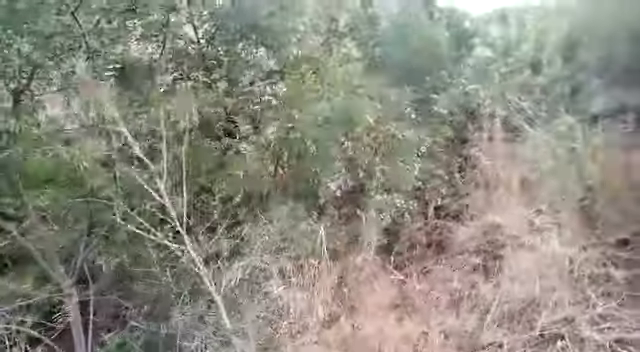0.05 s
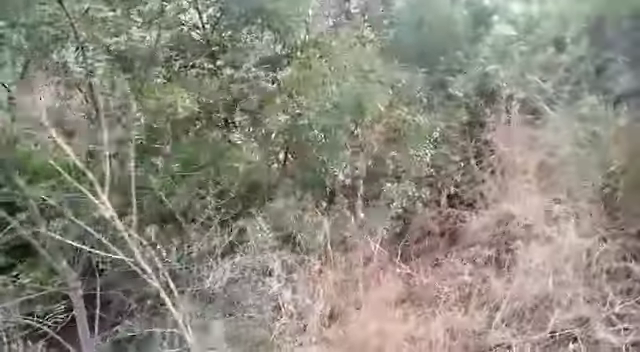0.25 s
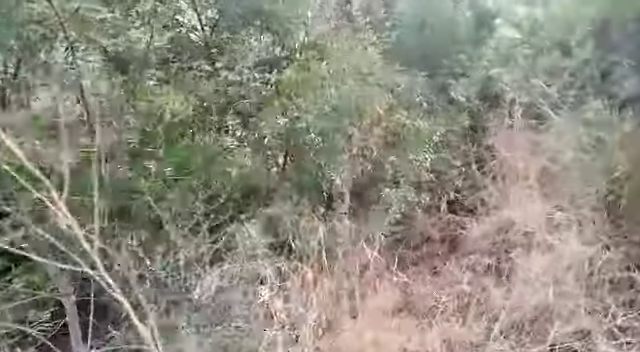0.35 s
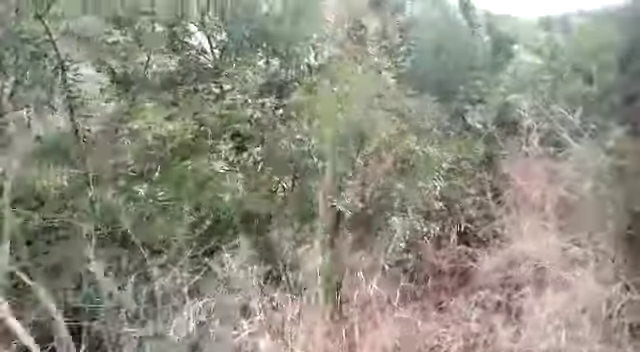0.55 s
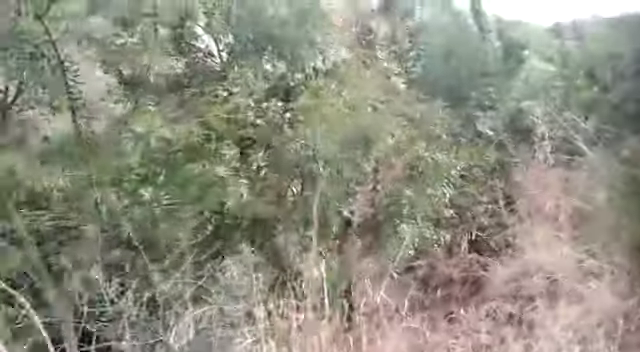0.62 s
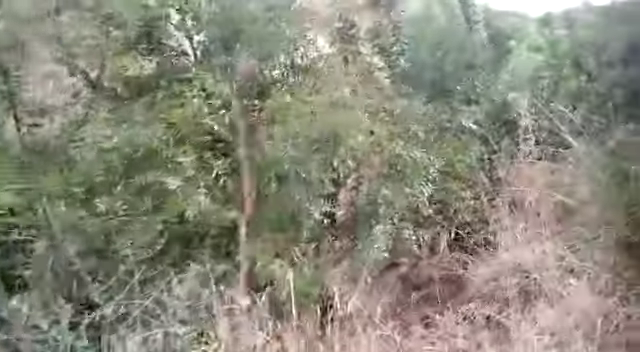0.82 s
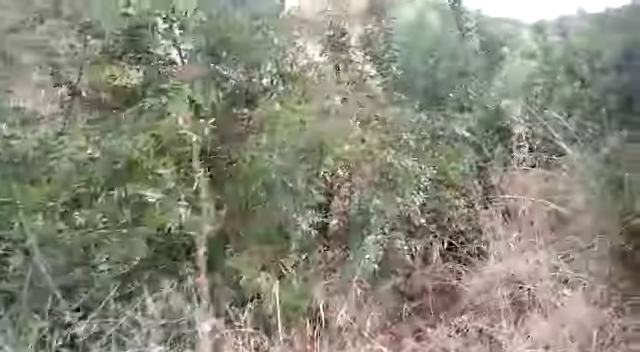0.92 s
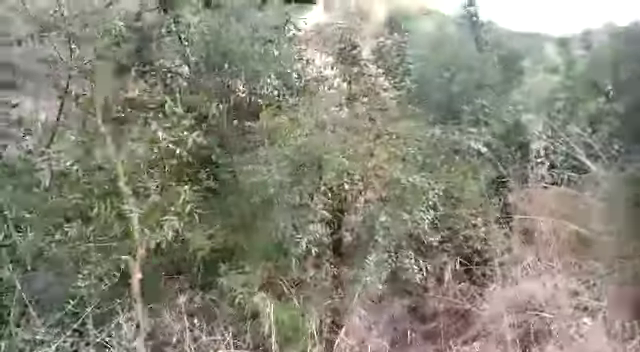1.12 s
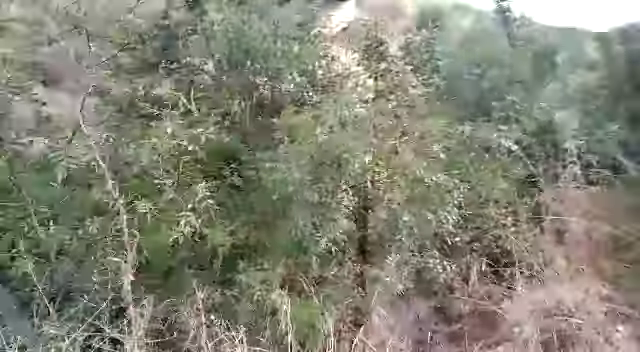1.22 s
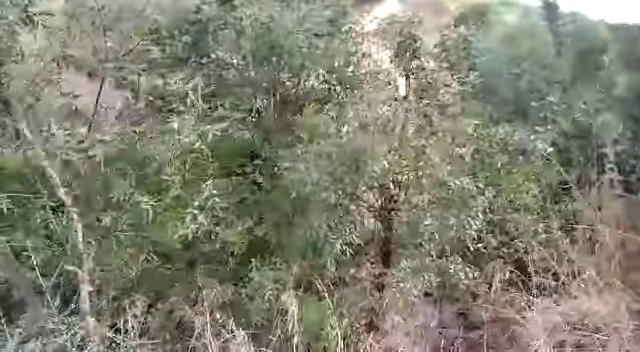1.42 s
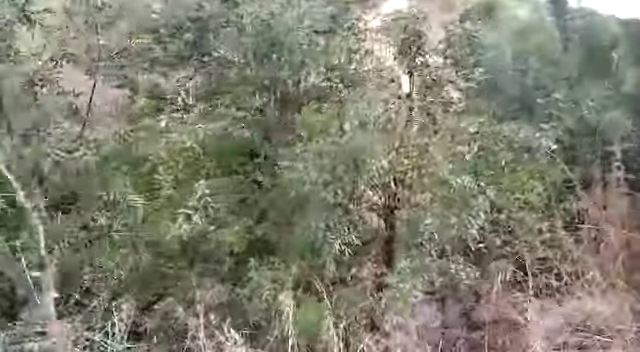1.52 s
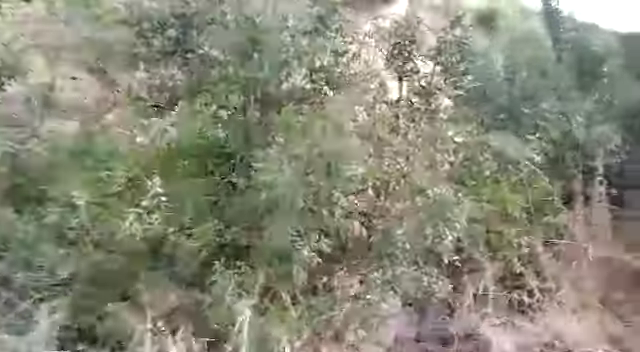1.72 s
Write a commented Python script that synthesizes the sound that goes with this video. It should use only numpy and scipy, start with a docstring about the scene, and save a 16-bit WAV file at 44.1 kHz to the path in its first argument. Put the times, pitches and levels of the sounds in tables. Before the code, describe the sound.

Wind gusts buffet a hand-held microphone outdoors, with dry stems snapping close by over faint stream wash

```python
"""Dry scrub beside a stream, heard through a hand-held pair of microphone ports.
Gusts buffet the left port with fluttering eddy noise and pitched slaps; the right port is sheltered.
A few dry stems snap close on the left, each a burst of short, decaying resonances with echoes.
Behind them a stream washes (flickering noise) and gurgles (rising bubble tones),
and leaves hiss in the wind (two bands of noise with fine crackle)."""
import sys
import numpy as np
from scipy import signal
from scipy.fft import rfft, irfft
from scipy.io import wavfile
from scipy.ndimage import uniform_filter1d

SR = 44100
rng = np.random.default_rng(int(sys.argv[2]) if len(sys.argv) > 2 else 0)


def waveform_to_disk(signal):
    """Save audio, clipped to [-1, 1], as 16-bit WAV at the path in sys.argv[1]."""
    frames = np.transpose(np.atleast_2d(signal))
    scaled = np.clip(frames, -1, 1) * 32767
    samples = np.round(scaled).astype(np.int16)
    wavfile.write(sys.argv[1], SR, samples)


N = 77175

# The background's levels over time.
# Each row: time in seconds, stream wash in dB, leaf hiss in dB, treble hiss in dB.
BACKGROUND_LEVELS = [(0, -51, -48.5, -53), (.15, -47.5, -47.5, -53.5), (.3, -48, -47, -53.5),
                     (.45, -49.5, -48.5, -55), (.58, -51.5, -45.5, -53), (.7, -46.5, -41.5, -51.5),
                     (.8, -48.5, -47, -54), (.9, -48, -49, -54.5), (1.05, -48, -47, -53.5),
                     (1.13, -45, -46.5, -50.5), (1.2, -46, -47, -52.5), (1.33, -44, -47, -53),
                     (1.45, -43, -45.5, -54.5), (1.6, -42.5, -46, -53.5), (1.75, -43, -46, -53)]
LEFT_GAIN_DB = 4  # lifts both the gusts and the slaps on the left port


def amp(db):
    """Turns decibels into an amplitude factor."""
    return 10 ** (np.asarray(db) / 20)


def evened(x):
    """Scales x to an RMS of one."""
    return x / np.sqrt(np.mean(x ** 2) + 1e-20)


def read(points, hz):
    """Reads a table of (Hz, value) at any frequency, along a log scale."""
    f, value = np.transpose(points)
    return np.interp(np.log(hz + 1), np.log(f + 1), value)


def curve(table, col):
    """Draws one column of a timed table as straight lines over the scene."""
    rows = np.array(table)
    return np.interp(np.arange(N) / SR, rows[:, 0], rows[:, col])


def coloured(x, points):
    """Filters x by a spectrum, silent outside its ends."""
    hz = np.fft.rfftfreq(N, 1 / SR)
    inside = (hz > points[0][0]) & (hz < points[-1][0])
    return irfft(rfft(x) * amp(read(points, hz)) * inside, N)


def buffeting():
    """Eddies press on each port: a low thud and brighter flutter on the left, a faint thud on the right."""
    # Wind on the left port. Each row: time in seconds, level in dB before the left gain,
    # brightness in dB (high flutter over low).
    gusts = [(0.0, -39.5, -4), (0.022, -45.5, -23), (0.036, -36.5, -4), (0.058, -43, -16),
             (0.094, -52.5, -1), (0.146, -49.5, -3), (0.232, -40.5, -11), (0.244, -23, -10.5),
             (0.26, -23.5, -16.5), (0.286, -25.5, -8), (0.324, -35, -16), (0.344, -18, -8.5),
             (0.374, -23, -7.5), (0.386, -16, -12), (0.444, -20, -13.5), (0.462, -26.5, -6.5),
             (0.488, -15.5, -28.5), (0.53, -17, -6), (0.554, -26, -14), (0.585, -20, -20),
             (0.615, -23, -17), (0.66, -30, -17), (0.698, -27.5, -26), (0.712, -18, -15.5),
             (0.74, -41.5, -23), (0.764, -34.5, -19), (0.8, -37, -36), (0.83, -35.5, -30),
             (0.878, -38, -37), (0.896, -43, -18), (0.945, -41, -22), (0.974, -28.5, -16),
             (1.002, -41.5, 1.5), (1.022, -31.5, -31), (1.044, -20.5, -23), (1.098, -18, -22),
             (1.12, -25, -24), (1.136, -23.5, -15.5), (1.198, -44.5, -6), (1.242, -37, -13),
             (1.27, -53.5, -5)]
    # Wind on the sheltered right port. Each row: time in seconds, level in dB.
    lee_levels = [(0, -55), (.04, -32.5), (.09, -44.5), (.3, -58), (.42, -45.5), (.55, -47), (.65, -55),
                  (.75, -45.5), (.85, -63.5), (1.0, -50), (1.07, -36.5), (1.12, -49), (1.45, -64),
                  (1.53, -48), (1.6, -69), (1.75, -69)]
    # Spectra of the thud and the flutter. Each row: frequency in Hz at usual speed, level in dB.
    low_spectrum = [(30, -61), (60, -29), (100, -3.5), (140, 2), (250, -4), (350, -15), (500, -41.5)]
    high_spectrum = [(250, -6.5), (350, 3.5), (420, 0), (600, -15.5), (900, -20), (1300, -33.5),
                     (2000, -51)]
    lump_db, lump_s = 2.0, 0.0059
    hurry, usual_db = 0.17, -24  # dB of speed per dB of gust level above the usual
    leak_db = -40.5  # left port heard in the right

    gust_db = curve(gusts, 1)
    # Eddies pass faster in stronger wind.
    speed = amp(hurry * (np.maximum(gust_db, -40) - usual_db))
    low = flutter(low_spectrum, speed)
    high = flutter(high_spectrum, speed)
    lee = flutter(low_spectrum, speed)

    # One lumpiness shakes both bands of the left port.
    shake = evened(amp(lump_db * lumps(lump_s)))
    eddies = low + amp(curve(gusts, 2)) * high
    left = amp(gust_db + LEFT_GAIN_DB) * shake * eddies + thumps()
    right = amp(curve(lee_levels, 1) + lump_db * lumps(lump_s)) * lee
    return np.array([left, right + amp(leak_db) * left])


def flutter(points, speed):
    """Eddy noise carried past at the given speed, its swings evened out and its crests sharpened."""
    steady, pointed = 0.54, 0.17  # evenness of the swings (0-1); sharpness of the crests
    z = signal.hilbert(evened(coloured(rng.standard_normal(N), points)))
    steadied = evened((z / (abs(z) + 0.053) ** steady).real)
    crested = evened(steadied + pointed * (steadied ** 2 - 1))
    # Reading the noise faster also raises its pitch.
    position = np.cumsum(speed) % (N - 1)
    return np.interp(position, np.arange(N), crested)


def lumps(seconds):
    """Slow random drift: noise averaged twice over the given time."""
    size = max(int(seconds * SR), 2)
    once = uniform_filter1d(rng.standard_normal(N), size)
    return evened(uniform_filter1d(once, size))


def thumps():
    """Single eddies slap the left port: a quick push that falls in pitch and dies within a few swings."""
    # Each row: start in seconds, level in dB before the left gain and decay, settled pitch in Hz.
    slaps = [(0.0328, -31, 246), (0.2386, -12, 151), (.332, -15, 152), (.3435, -16, 198), (.382, -11, 202),
             (.418, -15, 170), (.438, -15.5, 205), (.5155, -15.5, 226), (0.5591, -14.5, 171),
             (.7105, -18, 140), (0.7847, -21.5, 133), (.9645, -20, 107), (1.0341, -24.5, 218)]
    rise_s, t60_s = 0.001, 0.085
    drop, drop_s = 1.1, 0.0031  # extra pitch at the start as a share of the settled pitch; its decay time
    size = 4000
    t, out = np.arange(size) / SR, np.zeros(N + size)
    for start, db, hz in slaps:
        turns = hz * (t + drop * drop_s * (1 - np.exp(-t / drop_s)))
        envelope = amp(db + LEFT_GAIN_DB - 60 * t / t60_s) * np.minimum(t / rise_s, 1)
        i = round(start * SR)
        out[i:i + size] += envelope * np.sin(2 * np.pi * turns)
    return out[:N]


def snaps():
    """Each snap rings the stem's modes briefly; the right port hears it weaker and duller."""
    # Each row: start in seconds, left peak in dB before echoes and filtering,
    # left over right in dB, body modes' gain in dB.
    events = [(0.129, -7, 9, -2), (0.286, -10, 9, -1), (0.853, -2, 8, -1), (.8592, -19, 2, 2),
              (1.2368, -27, 8, -10), (1.2407, -32, 4.5, -10)]
    # Lower body modes, then bright edge modes.
    # Each row: frequency in Hz before random detuning, level in dB, 60 dB decay time in seconds.
    body_modes = [(1950, -4, .006), (2250, -1, .0055), (2650, -4, .0035), (3100, -5, .003),
                  (3700, -2, .003), (4300, -14, .0025)]
    edge_modes = [(6330, -20, 0.0021), (8660, -12, 0.0077), (11600, -2, 0.003), (12930, 4.5, 0.0021),
                  (13700, 5, .003)]
    # Off the ground and the hand. Each row: left port's delay in seconds, level in dB.
    echoes = [(.0022, -21), (.0009, -20), (.0014, -24)]
    # A thin stem radiates no bass. Each row: frequency in Hz, level in dB.
    thin_stem = [(700, -38), (1700, 0), (22000, 0)]
    rise_s = 0.00012
    right_edge_db, right_lag_s = -11, 0.00005
    size = 600
    t, out = np.arange(size) / SR, np.zeros((2, N))

    def ring(modes):
        """Sums decaying sines, each slightly detuned at random."""
        total = np.zeros(size)
        for hz, db, t60 in modes:
            detuned_hz = hz * rng.uniform(0.94, 1.03)
            total += amp(db - 60 * t / t60) * np.sin(2 * np.pi * detuned_hz * t)
        return np.minimum(t / rise_s, 1) * total

    for start, db, pan_db, body_db in events:
        body = amp(body_db) * ring(body_modes)
        edge = ring(edge_modes)
        peak = np.max(abs(body + edge))
        near = (body + edge) / peak
        far = (body + amp(right_edge_db) * edge) / peak
        # The direct sound comes first, then its echoes.
        for lag, echo_db in [(0.00028, 0), *echoes]:
            i = round((start + lag) * SR)
            j = round((start + 0.64 * lag + right_lag_s) * SR)
            out[0, i:i + size] += amp(db + echo_db) * near
            out[1, j:j + size] += amp(db + echo_db - pan_db) * far
    return coloured(out, thin_stem)


def stream():
    """Broad wash plus small bubbles whose pitch rises as they ring out."""
    # Colour of the wash. Each row: frequency in Hz, level in dB.
    wash_spectrum = [(40, -12), (100, 1), (200, 2), (400, -2.5), (600, -3), (800, 1.5), (1100, -1.5),
                     (1300, -24), (2000, -30)]
    bubbles_per_s, bubble_db = 220, -55  # rate at each port; overall level
    rise_s, t60_s = 0.0013, 0.032
    t, bubbles = np.arange(900) / SR, np.zeros((2, N))
    sizes_hz = np.geomspace(500, 1100, num=12)  # starting pitches
    for hz in sizes_hz:
        tone = np.sin(2 * np.pi * hz * t * (1 + 5.6 * t))
        ring = tone * amp(-60 * t / t60_s) * np.minimum(t / rise_s, 1)
        starts = sparse(bubbles_per_s / len(sizes_hz), 4.6)
        one_size = signal.oaconvolve(starts, ring[None])[:, :N]
        # Each port also hears a little of the other's bubbles.
        bubbles += one_size + 0.2 * one_size[::-1]
    level = amp(curve(BACKGROUND_LEVELS, 1))
    gurgle = evened(level) * amp(bubble_db) * evened(bubbles)
    return level * wash(wash_spectrum, patchy_db=0.95, flicker_db=0.84) + gurgle


def foliage():
    """Hiss of leaves and grass in two bands of noise, with a fine crackle of filtered clicks."""
    # Colours of the leaf hiss and the treble hiss. Each row: frequency in Hz, level in dB.
    leaf_spectrum = [(600, -31), (1200, -1), (1700, 1.5), (2400, -0.5), (3000, -4), (4200, -10),
                     (4600, -18), (5500, -24.5), (7400, -19.5), (8000, -51)]
    treble_spectrum = [(7300, -55), (7700, -3), (9300, 2.5), (10500, -2), (11400, -4.5), (12000, -9),
                       (13500, -11), (14200, -13), (14600, -38), (15500, -49)]
    crackles_per_s, crackle_db = 600, -59  # rate at each port; level of the crackle's leaf band
    clicks = sparse(crackles_per_s, 1.7) * rng.choice([-1., 1.], (2, N))
    crackle = evened(coloured(clicks, leaf_spectrum)) + 0.5 * evened(coloured(clicks, treble_spectrum))
    leaves = amp(curve(BACKGROUND_LEVELS, 2)) * wash(leaf_spectrum, patchy_db=1.5, flicker_db=0.06)
    treble = amp(curve(BACKGROUND_LEVELS, 3)) * wash(treble_spectrum, patchy_db=2.0, flicker_db=1.3)
    return leaves + amp(crackle_db) * crackle + treble


def wash(points, patchy_db, flicker_db):
    """Noise with drifting patches and a wide flicker, partly shared by both ports."""
    # Each row: frequency in Hz, left-right likeness from 0 to 1.
    likeness = [(60, 0.15), (130, 0.8), (290, .7), (640, 0.28), (1400, 0), (3000, 0.15), (7000, 0)]
    # Each row: frequency in Hz, left over right in dB.
    port_tilt = [(100, 4), (300, 3), (700, -1), (1300, 1), (2400, 8), (4400, 1.5), (8000, 1), (14000, 5)]
    frames, hz = N // 128 + 5, np.fft.rfftfreq(512, 1 / SR)
    a, b, c, d, patches = rng.standard_normal((frames, 257, 5)).T
    # Patches span a few frequency bins and many frames; the flicker moves all bins together.
    patches = evened(uniform_filter1d(uniform_filter1d(patches, 6, 0), 20, 1))
    flicker = evened(uniform_filter1d(rng.standard_normal(frames), 6))

    same = np.clip(read(likeness, hz), -1, 1)[:, None]
    left = a + 1j * b
    right = same * left + np.sqrt(1 - same ** 2) * (c + 1j * d)
    balance = amp(np.array([[0.5], [-0.5]]) * read(port_tilt, hz))[:, :, None]
    grains = np.array([left, right]) * amp(patchy_db * patches + flicker_db * flicker) * balance
    noise = signal.istft(grains, nperseg=512, noverlap=384)[1][:, :N]
    return evened(coloured(noise, points))


def sparse(per_s, spread_db):
    """Random clicks on each port at the given rate, a few of them large."""
    sizes = amp(spread_db * np.minimum(rng.exponential(1, (2, N)), 4))
    return sizes * (rng.random((2, N)) < per_s / SR)


def scene():
    """Mixes the wind, stream, foliage and snapping stems."""
    return buffeting() + stream() + foliage() + snaps()


def record(dry):
    """Microphone colour, then the band limit."""
    # Microphone response. Each row: frequency in Hz, level in dB.
    mic_response = [(10, -30), (40, -12.5), (62, -2.5), (90, 0), (14100, -0.5), (14600, -17), (15600, -33),
                    (22000, -30)]
    edge_hz = 15500
    low_pass = signal.firwin(511, edge_hz, window=("kaiser", 9), fs=SR)
    return signal.oaconvolve(coloured(dry, mic_response), low_pass[None], "same")


dry = scene()
out = record(dry)
waveform_to_disk(out)
```